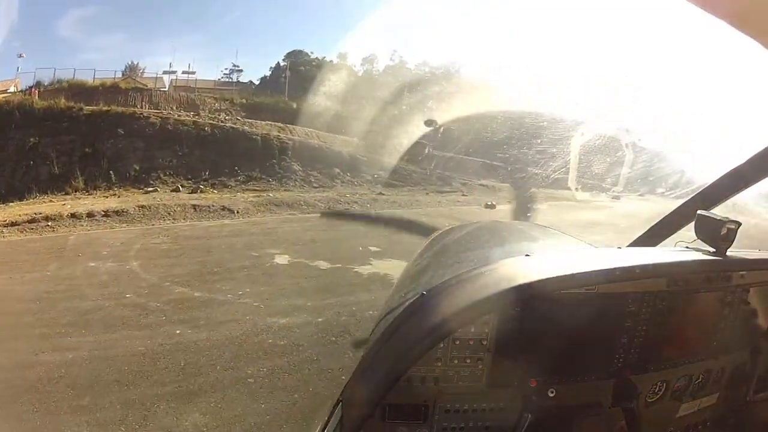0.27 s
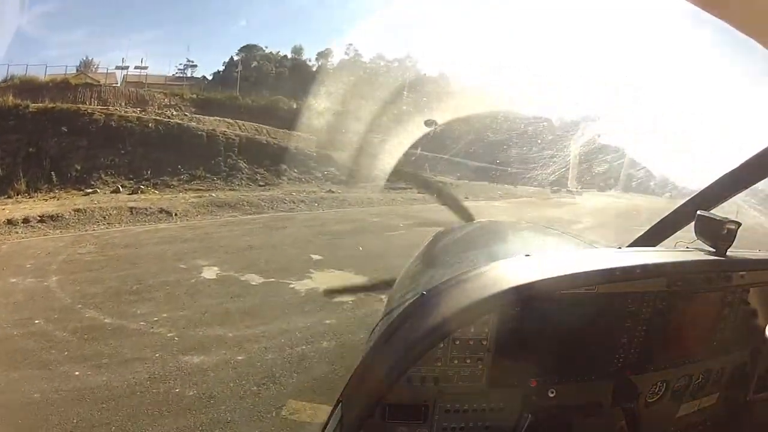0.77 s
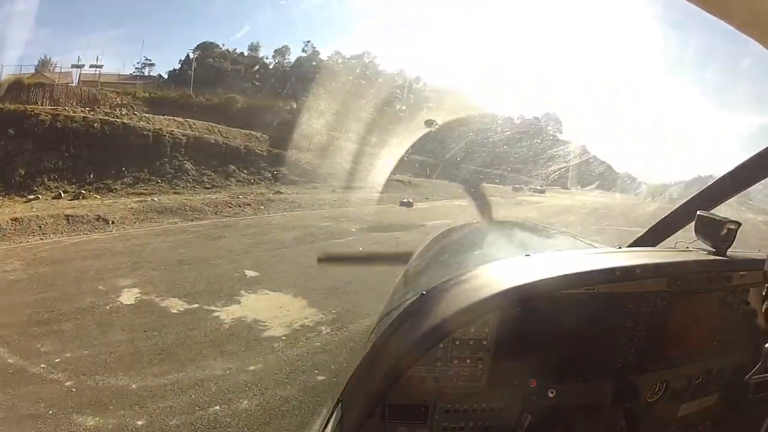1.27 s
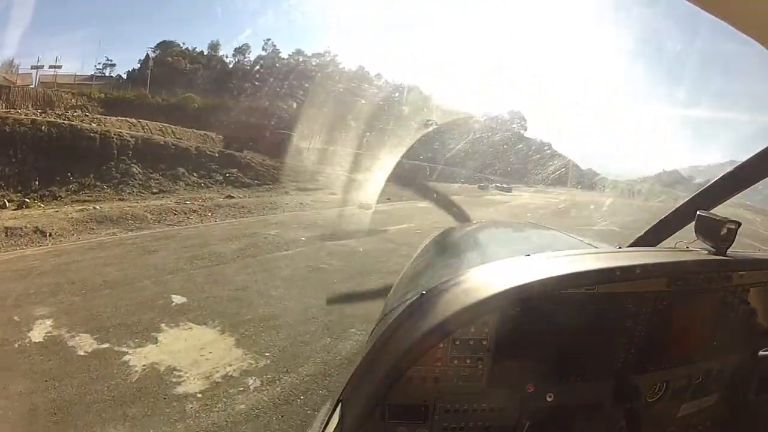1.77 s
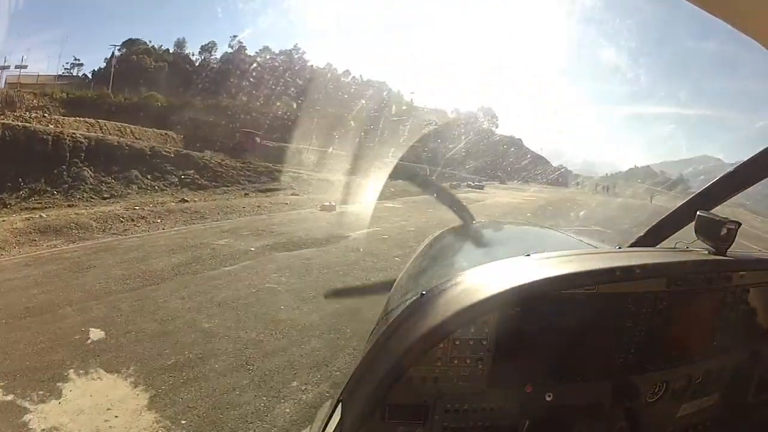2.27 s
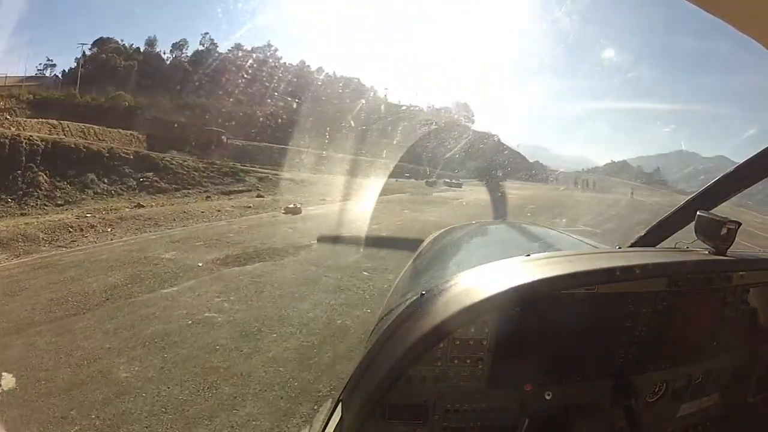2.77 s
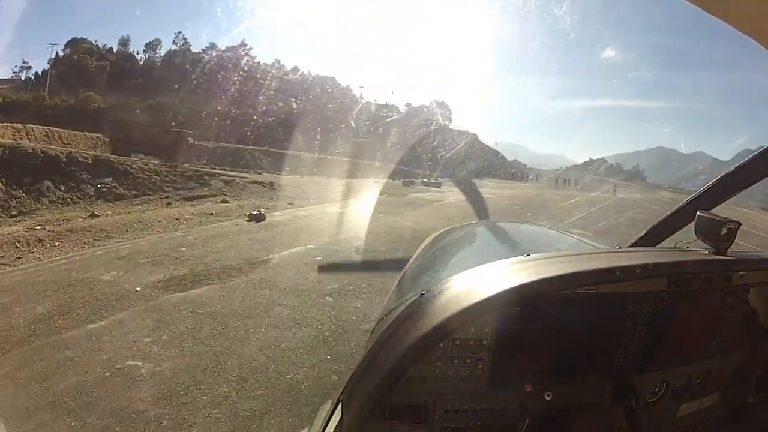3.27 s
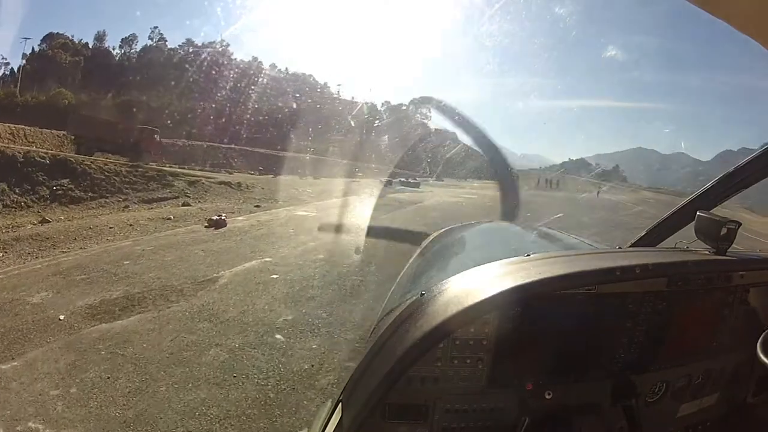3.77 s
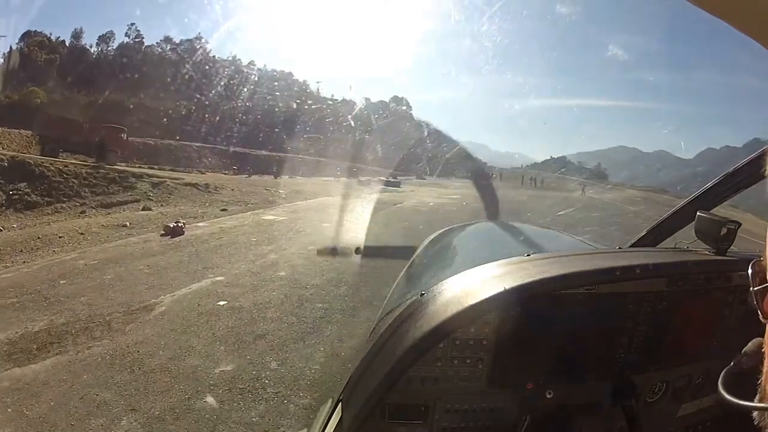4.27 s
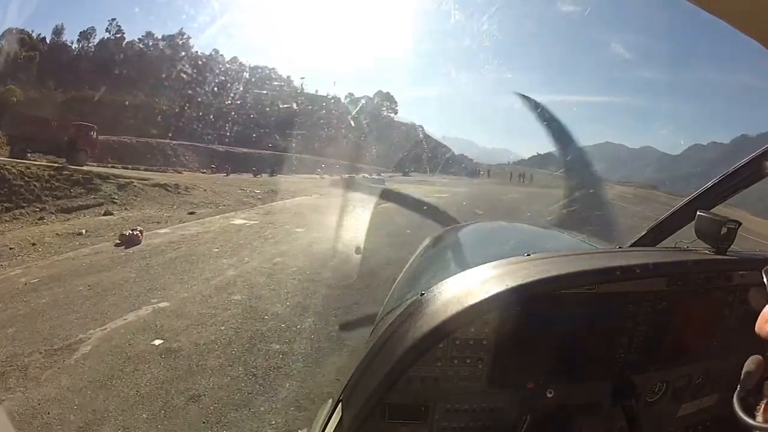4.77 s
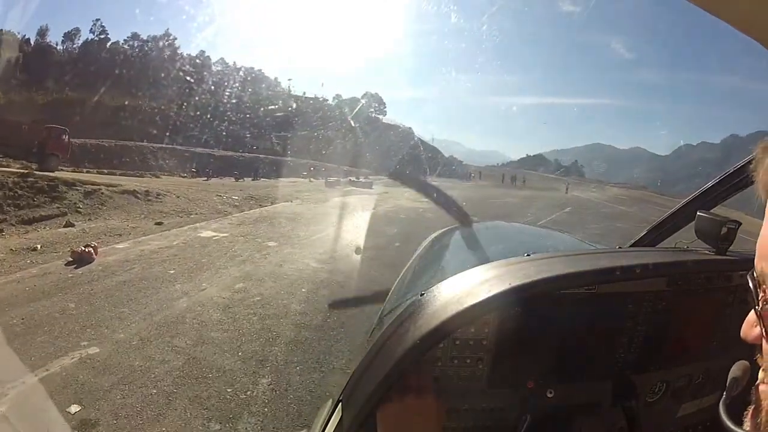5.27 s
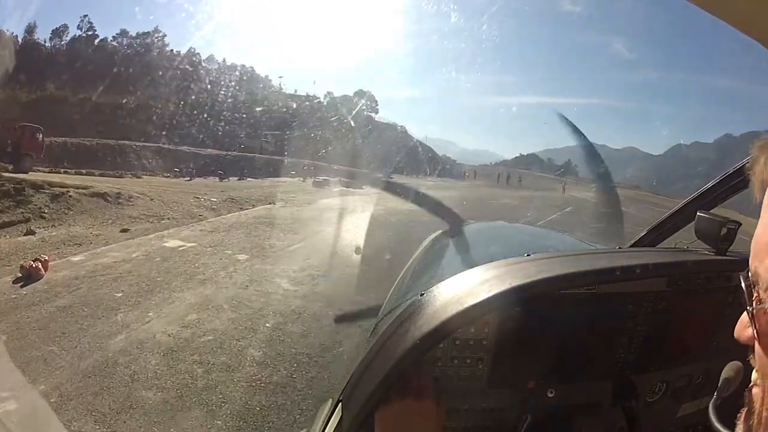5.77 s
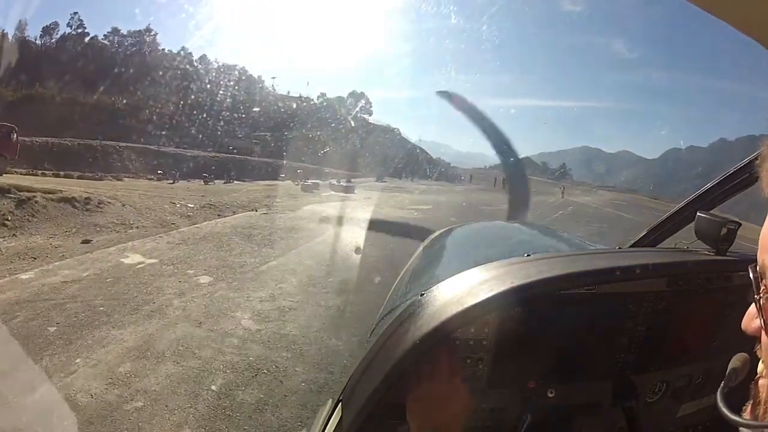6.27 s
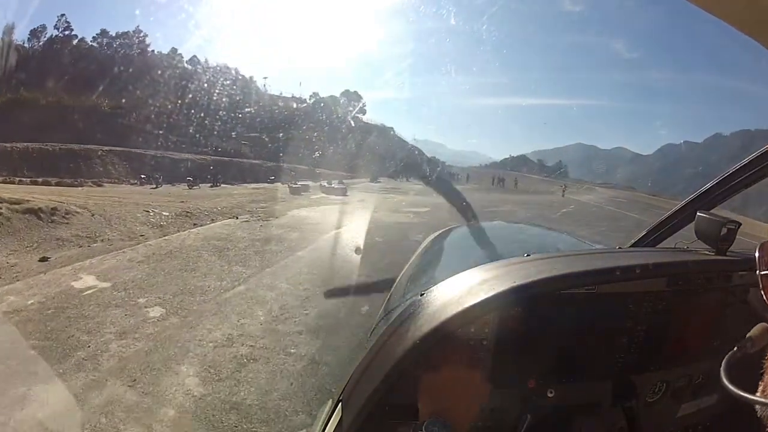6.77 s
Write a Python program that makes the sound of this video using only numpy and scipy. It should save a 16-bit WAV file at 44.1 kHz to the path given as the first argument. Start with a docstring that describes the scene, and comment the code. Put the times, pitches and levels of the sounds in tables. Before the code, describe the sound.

Inside a cockpit, a throbbing propeller and whining turbine ease down in pitch while a low drone grows under rushing air.

```python
"""Inside the cockpit of a taxiing turboprop, heard on a camera's microphone. At first three propeller
blades hum and throb, gearbox and gas turbine whine, and the rush of air and exhaust rings in the cabin.
After a second the power comes back towards idle: the tones sink, swelling as they cross the cabin's
standing waves, while a low drone grows and loose fittings tick now and then.
Throughout, the camera's coarse sample rate adds a glassy fizz."""
import sys
import numpy as np
from scipy import signal
from scipy.fft import rfft, irfft, next_fast_len
from scipy.io import wavfile

SR = 44100
rng = np.random.default_rng(int(sys.argv[2]) if len(sys.argv) > 2 else 0)


def dump(signal):
    """Clip the signal to [-1, 1] and save it as 16-bit WAV at the path in sys.argv[1]."""
    limited = np.clip(np.atleast_2d(signal).T, -1, 1)
    pcm = np.round(limited * 32767).astype(np.int16)
    wavfile.write(sys.argv[1], SR, pcm)


N = 309582
TIME = np.arange(N) / SR
BLADES = 3


def gain_of(db):
    return 10 ** (np.asarray(db) / 20)


def curves(rows):
    """Every column of a table, joined by straight lines in time."""
    time_s, *columns = np.transpose(rows)
    return [np.interp(TIME, time_s, column) for column in columns]


def drift(rate_hz, points=4096):
    """A smooth random wander of rms about 1, mostly slower than rate_hz."""
    hz = np.fft.rfftfreq(points, TIME[-1] / points)
    slow = irfft(rfft(rng.standard_normal(points)) * np.exp(-(hz / rate_hz) ** 2))
    slow /= np.sqrt(np.mean(slow ** 2))
    return np.interp(TIME, np.linspace(0, TIME[-1], points), slow)


def run_down(powered_hz, idle_hz, sag_hz_per_s, start_s, settle_s):
    """Speed of a shaft in turns per second: it holds, sagging slightly, then coasts towards idle."""
    coast = np.exp(-(np.maximum(TIME - start_s, 0) / settle_s) ** 1.25)  # above 1: sets in gently
    return idle_hz + (powered_hz - sag_hz_per_s * TIME - idle_hz) * coast


def turns_of(speed, first_throb_s=.07):
    """Turns of a shaft, counted from the first throb of the hum."""
    turns = np.cumsum(speed) / SR
    return turns - turns[round(first_throb_s * SR)]


def tone(turns, level_db, waver, waver_hz):
    """A sine whose level and phase waver in the turbulent air."""
    angle = 2 * np.pi * turns
    in_phase = (1 + waver * drift(waver_hz)) * np.cos(angle)
    quadrature = waver * drift(waver_hz) * np.sin(angle)
    return np.sqrt(2) * gain_of(level_db) * (in_phase + quadrature)


def shaft_tones(table, speed, power, waver, waver_hz):
    """Tones locked to one shaft, each with its own phase; their levels follow the engine's power."""
    turns = turns_of(speed)
    return sum(tone(multiple * turns + rng.random(), idle_db + power * (powered_db - idle_db),
                    waver, waver_hz) for multiple, powered_db, idle_db in table)


def cabin_tone(multiple, speed, waves, waver, waver_hz):
    """A tone locked to a shaft, swelling and fading as it slides across the cabin's standing waves."""
    hz = multiple * speed
    energy = sum(gain_of(db) ** 2 * .5 ** ((2 * (hz - centre) / width) ** 2)
                 for centre, width, db in waves)
    return tone(multiple * turns_of(speed), 10 * np.log10(energy + 1e-20), waver, waver_hz)


def swells(table, speed, waver, waver_hz):
    """Tones that each stand out only while their pitch suits one standing wave."""
    return sum(cabin_tone(multiple, speed, [wave], waver, waver_hz) for multiple, *wave in table)


def airframe():
    """The airframe drones low, keeping nearly to its own pitch."""
    # course of the drone: time_s, pitch_hz, level_db
    drone = [(0, 78, -55), (1, 77.5, -56), (1.5, 75.5, -59), (2.3, 73, -49), (3.5, 74, -48), (5, 75.3, -49),
             (7, 75.8, -51)]
    pitch_hz, level_db = curves(drone)
    return tone(turns_of(pitch_hz), level_db, waver=.15, waver_hz=2.3)


def rattles(low_hz=1500, t60_s=0.05, knock_hz=1800, knock_db=8):
    """Loose fittings tick in the cockpit: short bright bursts with a small knock in them."""
    # rattles: start_s, relative_level_db
    ticks = [(1.1345, -45), (1.138, -50), (5.0709, -56), (6.5216, -53.5)]
    envelope = sum(gain_of(db - 60 * abs(TIME - s) / t60_s) * (TIME >= s) for s, db in ticks)
    burst = 2 * rng.standard_normal(N) * envelope
    knock = gain_of(knock_db) * signal.lfilter(*signal.iirpeak(knock_hz, 4, fs=SR), burst)
    return signal.sosfilt(signal.butter(2, low_hz, "high", fs=SR, output="sos"), burst) + knock


def cabin_gain(hz, column):
    """Colour of the rush at the microphone; column 0 is under power, 1 at idle."""
    # resonances of cabin and camera housing: centre_hz, width_hz, powered_db_per_hz, idle_db_per_hz
    resonances = [(21.9, 5.4, -76, -66), (43, 9.6, -69, -66), (68, 12.5, -60, -63.5),
                  (112, 16, -61.5, -64.5), (145, 29, -65.5, -69), (188.5, 27.5, -55, -57),
                  (250.3, 35.7, -56.5, -57.5), (327, 22, -68, -64), (402, 30, -65, -72.5),
                  (455, 69, -67.5, -69), (571, 59, -72.5, -75.5), (736.5, 62.6, -70, -72),
                  (919, 31, -75, -81.5), (1072, 41, -69, -71.5), (1134, 54, -66, -71),
                  (1242, 76, -58.5, -61), (1408, 130, -75, -78), (1587, 54, -71, -76),
                  (1802, 116, -71, -73), (2017, 163, -68, -67), (2248, 127, -65, -61),
                  (2365, 107, -67, -64.5), (2516, 46, -71.5, -65.5), (2650, 48, -79.5, -75.5),
                  (2840, 60, -90, -80), (3100, 39, -91, -78.5), (3248, 81, -78.5, -80.5),
                  (3540, 340, -80, -80.5), (3764, 97, -62.5, -69.5), (3950, 104, -75, -80.5)]
    # the broad rush between them: frequency_hz, powered_db_per_hz, idle_db_per_hz
    rush = [(15, -79, -73), (90, -90, -87), (300, -72, -74), (640, -87, -92), (1000, -93, -101),
            (2000, -89, -91), (2900, -101, -109), (4400, -88.5, -91), (4950, -100, -103), (5580, -101, -98),
            (5640, -102, -102), (6000, -113, -118)]
    rush_hz, *rush_db = np.transpose(rush)
    density = gain_of(np.interp(np.log(hz + 1), np.log(rush_hz), rush_db[column])) ** 2
    for centre, width, *level_db in resonances:
        detuning = 2 * (hz - centre) / width
        density += gain_of(level_db[column]) ** 2 / (1 + (np.sqrt(2) - 1) * detuning ** 2) ** 2
    return np.sqrt(density * SR / 2)


def airflow(prop_speed, power, flutter_db=.5, flutter_hz=22, chop=0.082):
    """Exhaust and propeller wash fill the cabin, fluttering and lightly chopped by each blade."""
    # strength of the flow: time_s, gain_db
    flow = [(0, 0.3), (.5, .4), (1.1, -0.9), (2, -0.4), (3.1, -0.03), (4.3, 0.26), (5.6, 0.23), (7, 0.1)]
    gusts = gain_of(curves(flow)[0] + flutter_db * drift(flutter_hz))
    blade_chop = 1 + chop * np.cos(2 * np.pi * BLADES * turns_of(prop_speed))
    size = next_fast_len(N)
    hz = np.fft.rfftfreq(size, 1 / SR)
    spectrum = rfft(rng.standard_normal(N) * gusts * blade_chop, size)
    powered, idle = (irfft(spectrum * cabin_gain(hz, column), size)[:N] for column in range(2))
    return power * powered + (1 - power) * idle


def gas_turbine(speed, power):
    """The gas turbine whines in tones that sink with its drive shaft."""
    # lasting tones: shaft_multiple, powered_db, idle_db
    tones = [(.293, -56, -55.5), (.713, -62, -53.5), (.783, -51.5, -56), (.998, -55, -50),
             (1.463, -62, -58.5), (2, -59.5, -65.5), (3.132, -46.5, -55.5), (3.834, -77, -70),
             (4, -63, -48), (16, -84, -77.5)]
    # tones heard on one standing wave: shaft_multiple, centre_hz, width_hz, level_db
    passing = [(2, 725, 36, -51.5), (15.96, 5660, 170, -72.5)]
    whine = shaft_tones(tones, speed, power, waver=.16, waver_hz=5)
    return whine + swells(passing, speed, waver=.28, waver_hz=12)


def gearbox(speed, teeth=95):
    """The meshing teeth of the reduction gear sing one clear note."""
    # standing waves that the note meets: centre_hz, width_hz, level_db
    waves = [(1760, 58, -44.5), (1810, 13, -53), (1846, 11, -44.5), (1863, 15, -46), (1900, 20, -42.5),
             (1939, 12, -44), (1969, 25, -39.5), (1996, 21, -36), (2054, 20, -40)]
    return cabin_tone(teeth, speed, waves, waver=0.1, waver_hz=17)


def propeller_shaft(speed, power):
    """Weaker tones turn with the propeller shaft, from a low rumble up to a whine."""
    # lasting tones: shaft_multiple, powered_db, idle_db
    tones = [(0.99, -56, -52), (6.1, -62, -62), (8.46, -45.5, -57), (12, -53, -51), (17.4, -50, -62),
             (18, -64.5, -62), (99.6, -49.5, -75)]
    # tones heard on one standing wave: shaft_multiple, centre_hz, width_hz, level_db
    passing = [(12.98, 252.7, 11.5, -44), (33.86, 733.5, 3, -47), (122.6, 2412, 26, -42.5)]
    hum = shaft_tones(tones, speed, power, waver=0.37, waver_hz=4.2)
    return hum + swells(passing, speed, waver=.18, waver_hz=6)


def propeller(speed):
    """The blade hum beats at about 5 Hz with a hum just above, its third harmonic with one just below."""
    # standing waves that each of the four tones meets: centre_hz, width_hz, level_db
    blade_waves = [(64.6, 3, -38), (60.4, 2.4, -43), (57, 5, -48)]
    above_blade_waves = [(68.2, 6, -36), (61, 4, -50)]
    third_waves = [(190, 8.8, -41), (172.6, 12, -50)]
    below_third_waves = [(187, 12, -45)]
    blade = cabin_tone(BLADES, speed, blade_waves, waver=0.054, waver_hz=3)
    above_blade = cabin_tone(3.26, speed, above_blade_waves, waver=0.11, waver_hz=10)
    third = cabin_tone(3 * BLADES, speed, third_waves, waver=0.44, waver_hz=13)
    below_third = cabin_tone(8.78, speed, below_third_waves, waver=0.14, waver_hz=5)
    return blade + above_blade + third + below_third


def scene():
    """The cockpit in mono. Turbine speed sets the power, 1 at first and 0 at idle; the propeller lags."""
    prop_speed = run_down(21.667, idle_hz=17.878, sag_hz_per_s=.1444, start_s=1.026, settle_s=3.362)
    turbine_speed = run_down(395.05, idle_hz=342.87, sag_hz_per_s=.05, start_s=.943, settle_s=1.44)
    power = (turbine_speed - turbine_speed.min()) / np.ptp(turbine_speed)
    engine = propeller_shaft(prop_speed, power) + gas_turbine(turbine_speed, power)
    engine += propeller(prop_speed) + gearbox(prop_speed)
    return (engine + airframe() + airflow(prop_speed, power) + rattles())[None]


def record(dry, camera_rate_hz=12000, band_limit_hz=15350):
    """The camera samples coarsely and holds each value, which mirrors the whine into the treble."""
    coarse = signal.resample(dry, round(N * camera_rate_hz / SR), axis=1)
    held = signal.resample(np.repeat(coarse, 4, axis=1), N, axis=1)
    lowpass = signal.firwin(1023, band_limit_hz, window=("kaiser", 9), fs=SR)
    return signal.oaconvolve(held, lowpass[None], "same")


dry = scene()
out = record(dry)
dump(out)
```